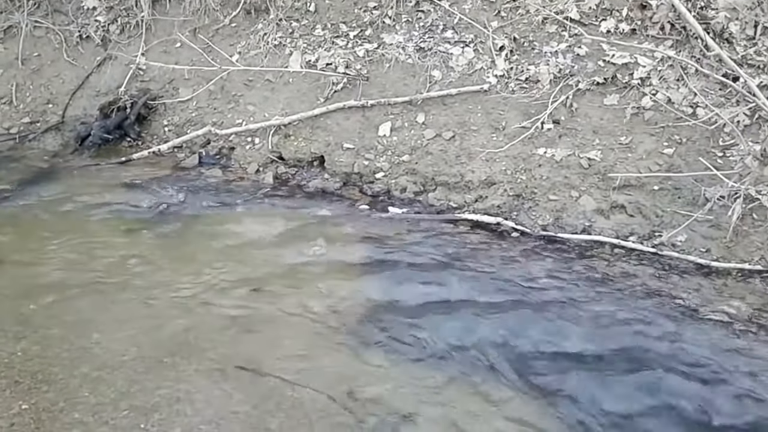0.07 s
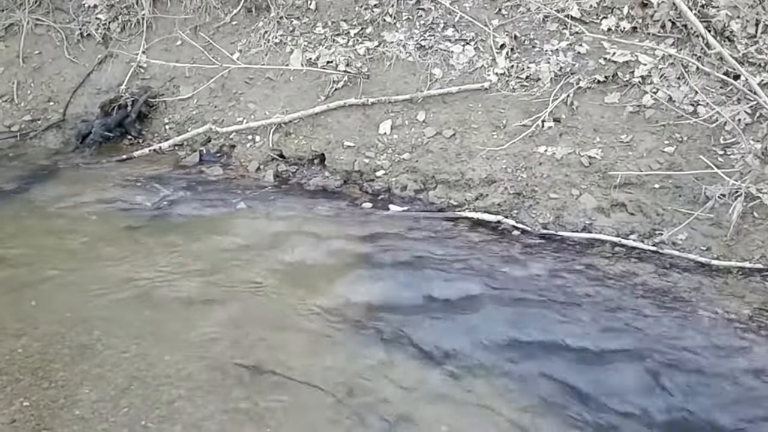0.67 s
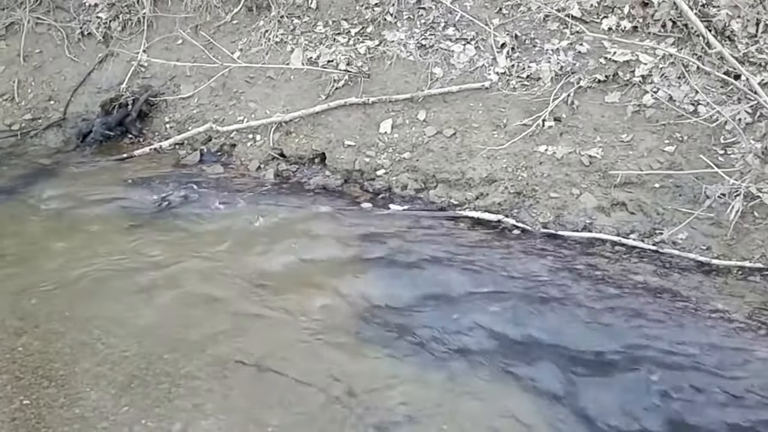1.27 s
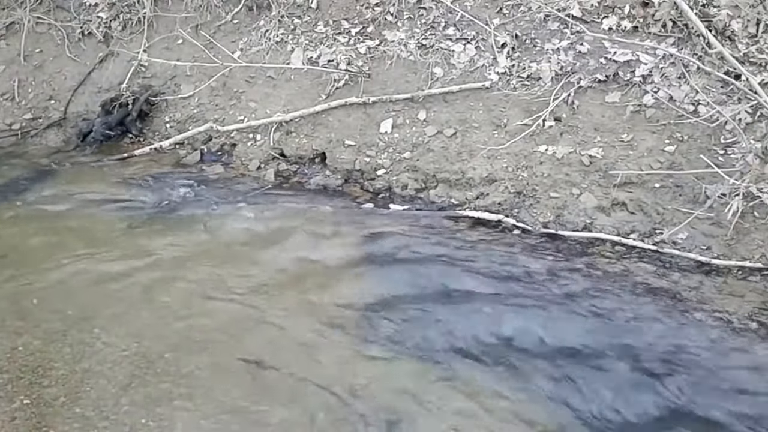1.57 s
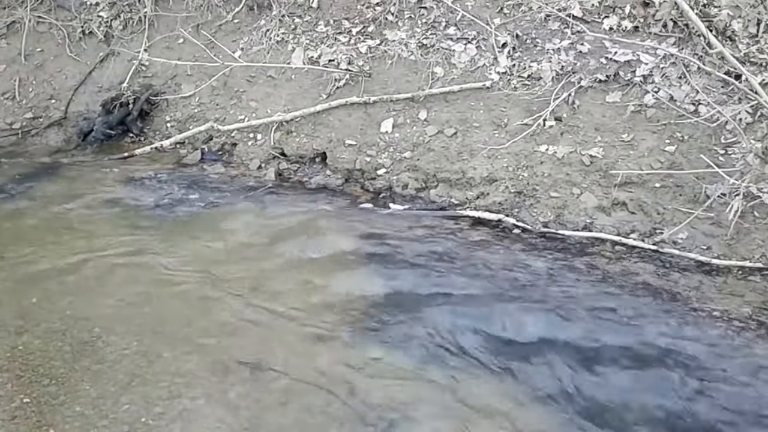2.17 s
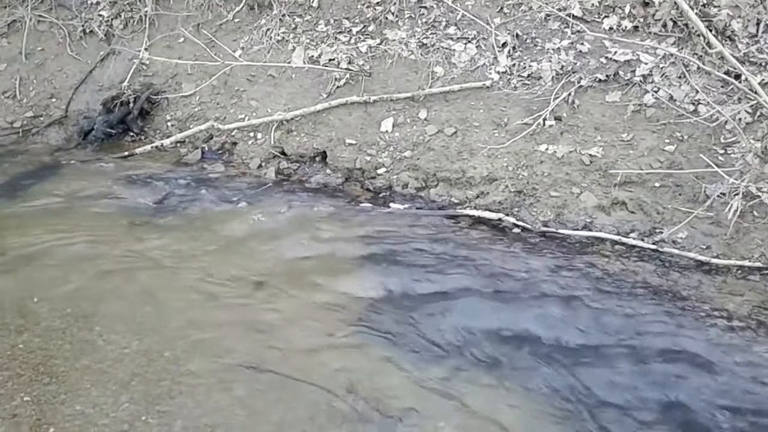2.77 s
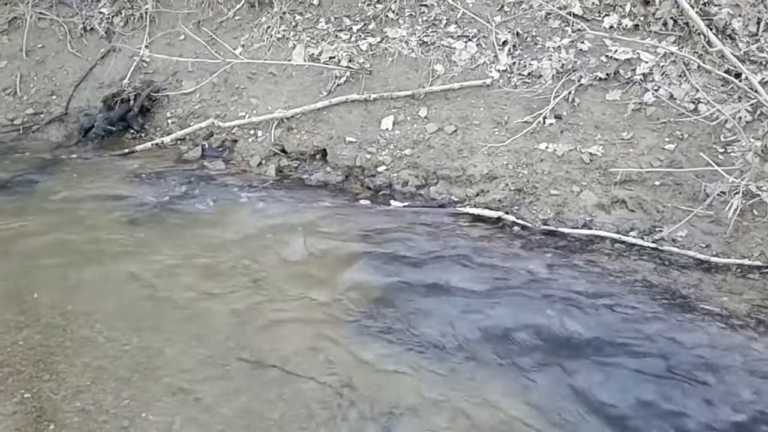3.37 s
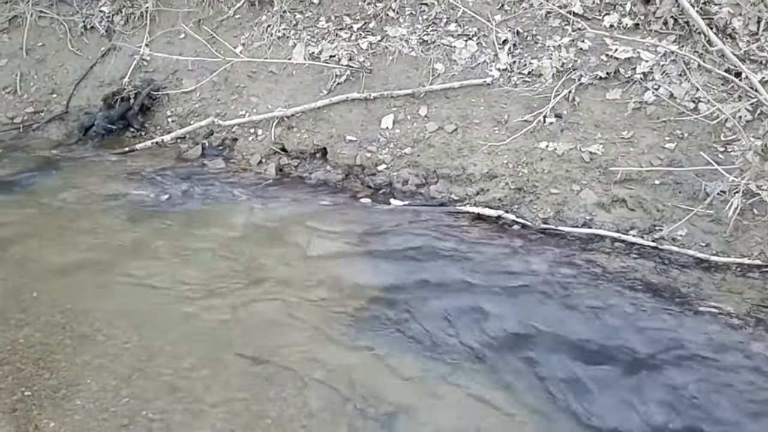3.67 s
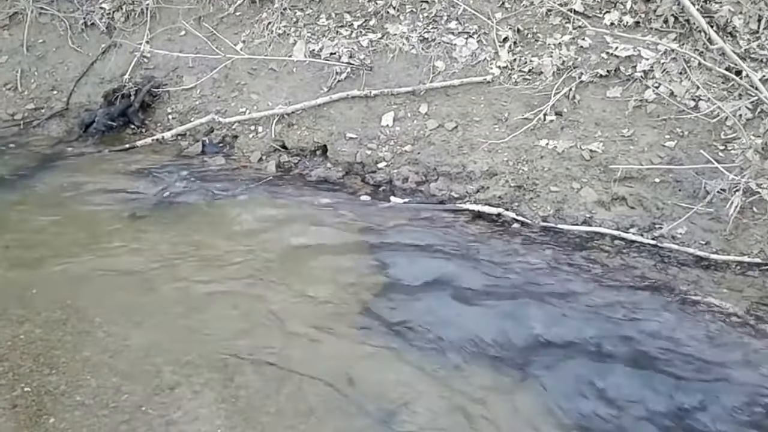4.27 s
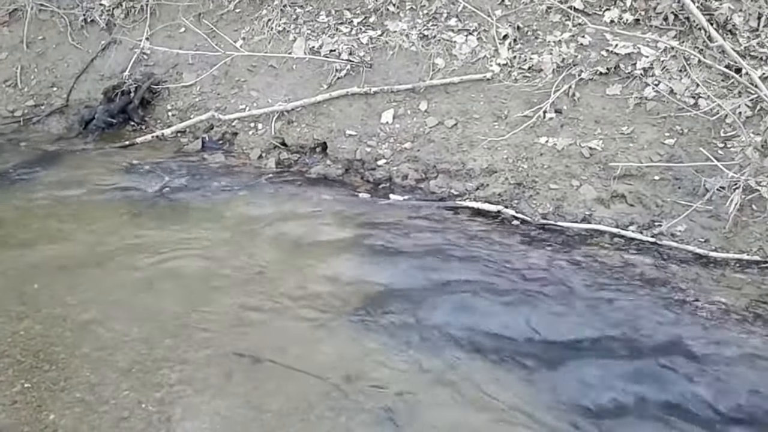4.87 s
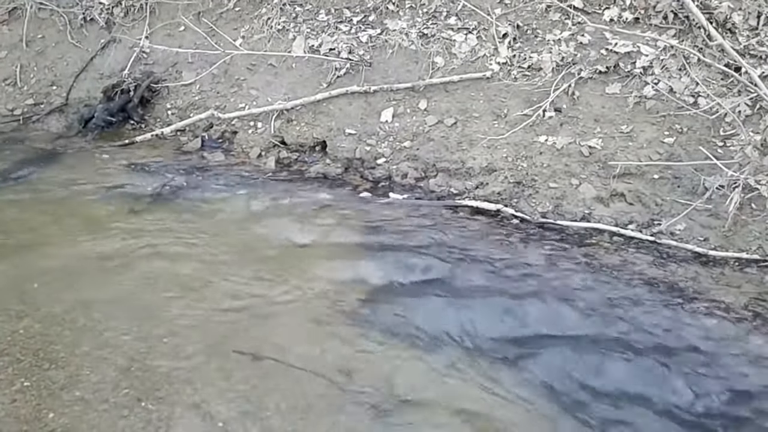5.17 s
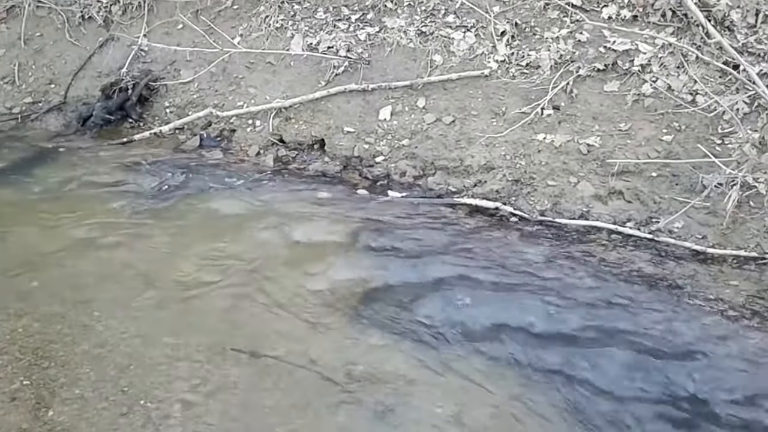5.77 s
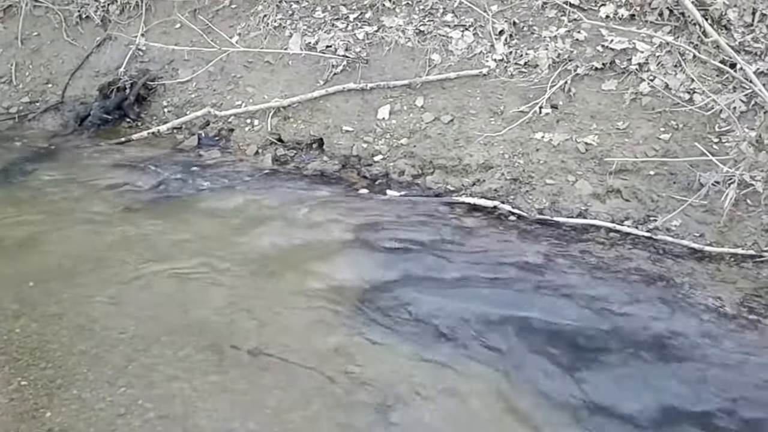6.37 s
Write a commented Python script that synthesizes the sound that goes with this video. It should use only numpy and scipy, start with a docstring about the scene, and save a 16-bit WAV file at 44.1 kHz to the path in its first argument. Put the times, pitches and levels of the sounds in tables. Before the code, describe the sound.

Outdoors, wind buffets the microphone in low, irregular gusts beside a gently babbling stream. A faint, fuzzy high ring dies away in the first seconds. The water keeps up a soft rush while wavelets fold into little gurgles, slap lightly and throw fine spray. Scattered drips and tiny pops sound close by, with a slight short echo off the bank.

```python
"""A shallow stream along a muddy bank: a soft rush of tiny ringing bubbles. Waves close over air pockets
that gurgle, wavelets slap, crests crackle into spray, drops plip and tick, foam pops. The bank adds a
short echo. Gusts buffet the two microphone ports, each in its own way. A thin high ring fades out in
the first seconds."""
import sys
import numpy as np
from scipy import signal
from scipy.fft import rfft, irfft, next_fast_len
from scipy.io import wavfile
from scipy.ndimage import uniform_filter1d, map_coordinates

SR = 44100
rng = np.random.default_rng(int(sys.argv[2]) if len(sys.argv) > 2 else 0)


def persist_wave(psi):
    """Save psi, clipped to +-1, as 16-bit WAV."""
    counts = np.round(np.clip(psi, -1, 1) * 32767).astype(np.int16)
    wavfile.write(sys.argv[1], SR, np.atleast_2d(counts).T)


N = 282681

# likeness of water noise at the two ports: freq_hz, correlation
WATER_COHERENCE = [(100, .05), (420, .15), (700, .7), (1200, .25), (1730, .6), (2200, .55), (3000, .15),
                   (4400, .4), (6500, .1), (15000, 0)]
# drop impact spectrum: freq_hz, density_db
SPLASH_SPECTRUM = [(500, -36), (1000, -6), (2200, 5), (3200, -1), (5200, 1), (6500, 3.5), (9000, -8.5),
                   (15000, -15)]
# water-on-water spectrum: freq_hz, density_db
SLAP_SPECTRUM = [(250, -21), (650, -7.5), (1100, 2), (2200, -3), (3200, -15.5), (6000, -18), (12000, -33)]


def amp(db):
    """Decibels to gain."""
    return 10 ** (np.asarray(db) / 20)


def unit(x):
    """Scale to rms 1."""
    return x / np.sqrt(np.mean(x ** 2) + 1e-20)


def along(points, hz):
    """Interpolate (freq_hz, value) rows on a log axis."""
    knots_hz, values = np.transpose(points)
    return np.interp(np.log(hz + 1), np.log(knots_hz + 1), values)


def curves(rows):
    """One value per sample for each column after time_s."""
    time_s, *columns = np.transpose(rows)
    return [np.interp(np.arange(N) / SR, time_s, column) for column in columns]


def wobble(rate_hz):
    """Smooth random curve, rate_hz knots a second."""
    return map_coordinates(rng.standard_normal(4096), [np.arange(N) * rate_hz / SR], mode="wrap")


def filtered(x, response):
    """Apply a complex frequency response."""
    size = next_fast_len(N + SR // 2)
    return irfft(rfft(x, size) * response(np.fft.rfftfreq(size, 1 / SR)), size)[..., :N]


def noise(gain, coherence):
    """Stereo noise of rms 1 with a given colour and left-right correlation."""
    def mid_side_gain(hz):
        angle = np.arccos(np.clip(along(coherence, hz), -1, 1)) / 2
        return gain(hz) * np.array([np.cos(angle), np.sin(angle)])
    mid, side = filtered(rng.standard_normal((2, N)), mid_side_gain)
    return unit(np.array([mid + side, mid - side]))


def water_noise(spectrum):
    """Coloured noise, partly common to both ports."""
    return noise(lambda hz: amp(along(spectrum, hz)), WATER_COHERENCE)


def patchy(x, depth_db):
    """Random gain patches over time and frequency, shallower in the treble."""
    hz, _, spectra = signal.stft(x, SR, nperseg=512)
    field = rng.standard_normal(spectra.shape[1:])
    field = uniform_filter1d(uniform_filter1d(field, 6, axis=0), 4, axis=1)
    patch_db = depth_db / (1 + (hz[:, None] / 4000) ** 2) * unit(field)
    return unit(signal.istft(spectra * amp(patch_db), nperseg=512)[1][:, :N])


def bursts(start_s, level_db, t60_s, attack_s):
    """Envelope of fast swells with exponential decays."""
    t = np.arange(SR // 3) / SR
    attack = 1 - np.exp(-t / attack_s)
    envelope = np.zeros(N + SR)
    for onset_s, db, decay_s in zip(*np.broadcast_arrays(start_s, level_db, t60_s)):
        envelope[int(onset_s * SR):][:len(t)] += amp(db - 60 * t / decay_s) * attack
    return envelope[:N]


def bubbles(start_s, level_db, hz, t60_s, glide_oct_per_s, pan_db, attack_cycles, spread_s):
    """Damped gliding sines, climbing as a bubble nears the surface; each has its own lag between ports."""
    columns = np.broadcast_arrays(start_s, level_db, hz, t60_s, glide_oct_per_s, pan_db, attack_cycles)
    start_s, level_db, hz, t60_s, glide_oct_per_s, pan_db, attack_cycles = (c[:, None] for c in columns)
    age = np.arange(int(min(t60_s.max(), 0.1) * SR) + 8)
    lag_s = spread_s * rng.standard_normal(start_s.shape)
    index = ((start_s * SR).astype(int) + age).ravel()
    ports = []
    for side in (1, -1):
        t = np.maximum(age / SR - np.maximum(side * lag_s, 0), 0)
        swell = 1 - np.exp(-(t * hz / attack_cycles) ** 2)
        decay = amp(-60 * t / t60_s)
        bend = 1 + np.log(2) * glide_oct_per_s * t * np.minimum(t / t60_s, 1)
        ring = amp(level_db + side * pan_db / 2) * swell * decay * np.sin(2 * np.pi * hz * t * bend)
        ports.append(np.bincount(index, ring.ravel(), N)[:N])
    return np.array(ports)


def swarm(count, low_hz, high_hz, cycles, size_db, climb_oct, attack_cycles, spread_s):
    """Random bubbles shed in threes; rms 1."""
    pitch, life, glide, size, delay = rng.random((count, 5)).T
    start_s = np.repeat(rng.random(count) * N / SR, 3)[:count] + 0.037 * delay
    hz = low_hz * (high_hz / low_hz) ** pitch
    t60_s = cycles / hz * (0.5 + life)
    level_db = size_db * np.minimum(-np.log(1 - size), 4)
    glide_oct_per_s = 2 * glide * climb_oct / t60_s
    pan_db = rng.normal(0, 0.3, count)
    return unit(bubbles(start_s, level_db, hz, t60_s, glide_oct_per_s, pan_db, attack_cycles, spread_s))


def droplets(start_s, level_db, low_hz, high_hz, cycles, scatter_s, count):
    """Each disturbance sheds count small bubbles, most of them early."""
    delay, pitch, size = rng.random((count * len(start_s), 3)).T
    onset_s = np.repeat(start_s, count) + scatter_s * delay ** 2
    db = np.repeat(level_db, count) - 9 * size
    hz = low_hz * (high_hz / low_hz) ** pitch
    return bubbles(onset_s, db, hz, cycles / hz, glide_oct_per_s=4, pan_db=rng.normal(0, 1, len(hz)),
                   attack_cycles=2.6, spread_s=50e-6)


def strays(count, level_db, low_hz, high_hz, extra=()):
    """Random events strewn over the whole time: start_s, level_db, pitch_hz, *extra."""
    when, size, pitch = rng.random((count, 3)).T
    start_s = (np.arange(count) + when) / count * N / SR
    hz = low_hz * (high_hz / low_hz) ** pitch
    return np.column_stack(np.broadcast_arrays(start_s, level_db + 6 * (size - 0.5), hz, *extra))


def plips(start_s, level_db, hz, t60_s, pan_db):
    """Small bubbles swell as they pinch off, sag in pitch and damp quickly."""
    makeup_db = 29.5  # offsets the decay during the swell
    return bubbles(start_s, level_db + makeup_db, hz, t60_s, glide_oct_per_s=-7.5, pan_db=pan_db,
                   attack_cycles=0.48 * hz * t60_s, spread_s=12e-6)


def riffle():
    """Bubbles of four sizes, pulsed by wavelets, over the rush of water farther off."""
    # strength of the flow: time_s, babble_db, spray_db
    flow = [(0, -54.5, -63.5), (1.4, -55.5, -65.5), (2.2, -69, -67.5), (3.5, -65.5, -64.5),
            (4.3, -74, -67.5), (5.1, -64, -71.5), (5.7, -52.5, -68), (6.41, -96, -69.5)]
    # distant water: freq_hz, density_db
    rush_spectrum = [(40, 10), (230, -20), (320, -6.5), (430, -9.5), (700, 2), (1300, 2), (2250, 2.5),
                     (2900, -10.5), (3700, -10), (5200, -8), (6500, -14), (9000, -18), (12000, -14),
                     (15500, -15)]
    babble_db, spray_db = curves(flow)
    rush = amp(-53.5 + 0.14 * wobble(3.6)) * patchy(water_noise(rush_spectrum), depth_db=6)
    large = swarm(1150, 604, 1450, cycles=26.3, size_db=1.5, climb_oct=0.35,
                  attack_cycles=4.1, spread_s=87e-6)
    small = swarm(1200, 1460, 2397, cycles=30, size_db=3, climb_oct=0.055,
                  attack_cycles=27, spread_s=60e-6)
    fizz = swarm(6000, 2730, 8200, cycles=23, size_db=3.6, climb_oct=0.04,
                 attack_cycles=2.5, spread_s=50e-6)
    crackle = swarm(2600, 8500, 15500, cycles=11, size_db=4, climb_oct=0.02,
                    attack_cycles=1, spread_s=60e-6)
    lapping_db = 2.6 * wobble(20) + 1.2 * wobble(8)  # each wavelet traps air and throws spray
    babble = amp(babble_db + lapping_db / 2) * (amp(-6) * large + amp(-4) * small)
    spray = amp(spray_db + lapping_db) * (amp(2) * fizz + amp(-10.5) * crackle)
    return rush + babble + spray


def thin_ring():
    """A fuzzy high ring dies away, upper resonances first."""
    # overall fade: time_s, level_db
    fade = [(0, -52.5), (.45, -53.5), (.8, -57.5), (1.3, -69), (2, -83), (2.6, -100)]
    # resonances: centre_hz, width_hz, level_db, extra_fade_db_per_s
    resonances = [(2325, 105, -1, 0), (2570, 280, -5.5, 4), (3156, 16, -15.5, 12), (3050, 700, -6, 26),
                  (4100, 600, -8, 90), (6250, 220, -9, 190)]
    t = np.arange(N) / SR
    ring = 0
    for centre_hz, width_hz, level_db, fade_db_per_s in resonances:
        band = noise(lambda hz: 1 / (1 + ((hz - centre_hz) / width_hz * 1.5) ** 2), [(2300, 0.8)])
        ring += amp(level_db - fade_db_per_s * t) * band
    return amp(curves(fade)[0]) * ring


def buffet(spectrum, lump_db, lump_hz):
    """Turbulence, unrelated between ports: lumpy from eddy to eddy, level over longer times."""
    turbulence = noise(lambda hz: amp(along(spectrum, hz)), coherence=[(100, 0)])
    turbulence *= amp(lump_db * np.array([wobble(lump_hz), wobble(lump_hz)]))
    local_power = np.abs(uniform_filter1d(turbulence ** 2, size=SR // 14))
    return turbulence / np.sqrt(local_power + 1e-9)


def gust_pressure():
    """Wind strength at each port: gusts swell and ebb on top of the breeze."""
    # light air between gusts: time_s, left_db, right_db
    breeze = [(0, -32, -18), (0.3, -37, -36.5), (0.55, -45.5, -41), (1.3, -43, -43), (2.2, -44.5, -41.5),
              (2.8, -47.5, -64), (2.95, -67, -56), (3.1, -53, -44.5), (3.4, -55.5, -51.5),
              (3.95, -28.5, -49), (4.35, -68, -80), (5.05, -40, -30), (5.5, -50, -58), (5.9, -41.5, -43),
              (6.41, -72, -62)]
    # gusts: peak_s, length_s, left_db, right_db
    gusts = [(0.053, 0.064, -44, -18.5), (0.127, 0.025, -38, -20.5), (0.241, 0.08, -35, -26),
             (0.374, 0.095, -30.5, -26.5), (0.601, 0.014, -46, -29), (0.725, 0.051, -36, -32),
             (0.906, 0.27, -34.5, -39.5), (1.204, 0.027, -33.5, -55), (1.388, 0.044, -29.5, -42),
             (1.46, 0.055, -31, -32.5), (1.86, 0.051, -28.5, -41), (2.14, 0.11, -33, -40),
             (2.509, 0.097, -48, -29), (2.672, 0.33, -58, -35), (3.531, 0.041, -37.5, -41),
             (3.628, 0.075, -29.5, -30), (3.801, 0.038, -32, -24), (3.857, 0.06, -32.5, -35),
             (3.941, 0.063, -27.5, -20.5), (4.03, 0.031, -37, -29), (4.101, 0.075, -28.5, -31.5),
             (4.152, 0.03, -31.5, -37), (4.268, 0.038, -64, -30.5), (4.397, 0.3, -79, -39),
             (4.52, 0.043, -49, -42), (4.631, 0.11, -39, -29), (4.75, 0.044, -49, -42),
             (4.9, .04, -45, -31), (4.975, 0.038, -40, -22.5), (5.058, 0.092, -49, -29.5),
             (5.308, 0.11, -45, -38), (5.601, 0.046, -46, -37.5), (5.744, 0.079, -33.5, -37),
             (5.866, 0.055, -43, -31), (6.147, 0.022, -45, -34)]
    t = np.arange(N) / SR
    power = amp(curves(breeze)) ** 2
    for peak_s, length_s, left_db, right_db in gusts:
        swell = np.exp(-((t - peak_s) / (0.42 * length_s)) ** 2)
        power += amp([[left_db], [right_db]]) ** 2 * swell
    waver_db = 1.76 * np.array([wobble(8), wobble(17)])
    return np.sqrt(power) * amp(waver_db)


def wind():
    """Gusts rumble on each port; small eddies add a brighter flutter, more on the left."""
    # small eddies: time_s, flutter_db
    eddies = [(0, -2.5), (0.9, -2.5), (2.3, -7), (4, -17.5), (5, -24), (6.41, -9)]
    # eddy spectrum: freq_hz, density_db
    flutter_spectrum = [(80, -74), (170, 8.5), (240, 0.5), (330, -4.5), (440, -12.5), (482, -11),
                        (540, -14), (620, -21), (900, -30.5), (2000, -43), (5000, -58.5)]
    # gust spectrum: freq_hz, density_db
    rumble_spectrum = [(15, -64), (35, -34), (55, -8), (85, 0), (120, 2), (170, -6), (240, -16), (330, -29),
                       (450, -39), (900, -83), (2000, -110)]
    port_db, port_highpass_hz = np.array([[2], [-2.5]]), 42
    flutter = amp(curves(eddies)[0] + port_db) * buffet(flutter_spectrum, lump_db=4.5, lump_hz=60)
    pressure = gust_pressure() * (buffet(rumble_spectrum, lump_db=3.3, lump_hz=55) + flutter)
    return filtered(pressure, lambda hz: hz ** 2 / np.hypot(hz ** 2, port_highpass_hz ** 2))


def ticks():
    """Spray lands with a crack, traps a tiny pinging bubble and scatters."""
    # spray landings: start_s, level_db, pitch_hz
    landings = [(0.3473, -31, 5140), (0.987, -31.5, 7540), (1.0455, -35, 6850), (1.1612, -39, 6540),
                (1.237, -36, 4840), (1.8451, -30, 6420), (2.422, -36, 4270), (2.5017, -35, 6530),
                (2.6021, -38, 5340), (2.8397, -36, 4940), (3.305, -37, 6330), (4.2635, -34, 6500),
                (4.389, -39, 8050), (4.436, -37, 5300), (4.451, -37, 5200), (4.5028, -35, 5400),
                (4.638, -34, 4850), (4.8383, -31, 5200), (5.2228, -36, 3950), (5.598, -42, 5000),
                (5.654, -30.5, 4880)]
    # impact spectrum: freq_hz, density_db
    crack_spectrum = [(1200, -24), (3000, -8), (5500, 0), (8000, -4), (11000, -10), (15000, -18)]
    faint = strays(count=18, level_db=-46, low_hz=4670, high_hz=7400)
    start_s, level_db, hz = np.vstack([landings, faint]).T
    crack = bursts(start_s, level_db - 10.5, t60_s=0.009, attack_s=0.0003) * water_noise(crack_spectrum)
    ping = plips(start_s, level_db - 7.5, hz, t60_s=0.0045, pan_db=1.5)
    scatter = droplets(start_s, level_db - 11, 3800, 7200, cycles=22, scatter_s=0.022, count=5)
    return crack + ping + scatter


def drips():
    """Drops hit with a wet crack, a bright plip and a weak after-ring."""
    # drops and small bubbles: start_s, level_db, pitch_hz, t60_s, left_minus_right_db
    drops = [(1.1620, -31.5, 2845, 0.0056, -7.5), (1.3238, -43, 2000, 0.017, 0),
             (2.1098, -45, 2110, 0.016, -1), (2.15, -45.5, 2310, .012, -1), (2.2475, -44, 3780, 0.0063, -9),
             (2.4215, -46.5, 3180, 0.0057, -9), (2.704, -45.5, 1960, 0.016, -1),
             (2.802, -43.5, 2150, .011, -4), (2.9706, -43.5, 2170, 0.011, 1),
             (3.709, -49, 3890, 0.0076, -7), (4.514, -42.5, 2120, 0.011, -3),
             (4.5158, -47.5, 2930, 0.0067, -2), (5.1292, -41, 2080, 0.0072, -5),
             (5.2, -52, 2700, 0.0077, 0), (5.264, -54, 2720, .009, -2), (5.3442, -36, 2120, .008, 0),
             (5.6304, -42.5, 2210, .012, -1), (5.6605, -42, 2100, .01, -9), (5.692, -44.5, 2140, .01, -6),
             (5.8322, -42, 3040, 0.0057, -1), (6.0492, -43.5, 2150, 0.009, -2)]
    faint = strays(count=9, level_db=-51, low_hz=1790, high_hz=2400, extra=[0.01, 0])
    start_s, level_db, hz, t60_s, pan_db = np.vstack([drops, faint]).T
    impact = bursts(start_s, level_db - 15, t60_s=0.026, attack_s=0.0003) * water_noise(SPLASH_SPECTRUM)
    plip = plips(start_s, level_db, hz, t60_s, pan_db)
    after_ring = plips(start_s + t60_s / 2, level_db - 19, hz, 2 * t60_s, pan_db)
    return impact + plip + after_ring


def splashes():
    """A broken crest sprinkles droplets over a crackle of fine bursting ones."""
    # breaking crests: start_s, level_db, t60_s
    crests = [(1.265, -50.5, 0.19), (1.355, -52.5, 0.31), (1.464, -57, 0.11), (1.591, -53, 0.18),
              (1.872, -52, 0.27), (2.503, -58, 0.13), (2.811, -60, 0.57), (3.574, -52.5, 0.14),
              (3.625, -48.5, 0.092), (4.013, -53.5, 0.35), (4.271, -58, 0.17), (4.435, -57, 0.18),
              (4.64, -51.5, .3), (5.225, -56, 0.15), (5.243, -51.5, 0.25), (5.568, -51, 0.3),
              (5.635, -50, .16), (5.905, -48.5, 0.092)]
    start_s, level_db, t60_s = np.transpose(crests)
    clicks_per_s = 1500  # per port, half of them common to both
    clicks = (rng.random((3, N)) < clicks_per_s / SR / 2) * rng.standard_normal((3, N))
    crackle = unit(filtered(clicks[:2] + clicks[2], lambda hz: amp(along(SPLASH_SPECTRUM, hz))))
    sprinkle = droplets(start_s, level_db + 10, 1800, 6800, cycles=21, scatter_s=0.06, count=13)
    return bursts(start_s, level_db - 1, t60_s, attack_s=0.0023) * crackle + sprinkle


def gurgles():
    """A wave folds and churns: a large bubble glides, a weaker twin beats with it, small ones break off."""
    # trapped air pockets: start_s, level_db, pitch_hz, t60_s, glide_oct_per_s, attack_cycles
    pockets = [(1.283, -42, 772, 0.08, 3, 6.5), (1.354, -38, 1090, 0.052, -6, 2),
               (1.465, -35.5, 907, 0.064, 6, 1.4), (1.54, -32, 1176, 0.032, 0.5, 7.9),
               (1.585, -37.5, 705, 0.05, 16, 4.3), (1.722, -43, 615, 0.12, 12, 3.2),
               (1.876, -35.5, 788, 0.1, 4, 3.3), (1.977, -42, 966, 0.13, -0.5, 3.3),
               (2.023, -36, 1470, 0.053, 5, 2), (2.231, -33.5, 1022, 0.045, 10, 0.63),
               (2.24, -36, 1410, 0.071, 13, 9.5), (2.292, -39, 1194, 0.073, 19, 8.2),
               (2.373, -36.5, 840, 0.14, -1, 2.9), (2.548, -38, 676, 0.07, -4, 2),
               (2.599, -39.5, 930, 0.082, 0.5, 2.5), (2.768, -41, 786, 0.14, 11.5, 9.1),
               (2.81, -37.5, 1400, 0.081, 3.5, 4), (2.855, -42, 790, 0.14, 14.5, 4.4),
               (2.946, -40, 1130, 0.065, 9, 3.3), (2.964, -31.5, 1440, 0.042, 12, 3),
               (2.978, -48, 835, 0.2, 7, 4.1), (3.047, -45, 1160, .06, -6, 3),
               (3.571, -42, 903, 0.11, 6.5, 2), (3.615, -46, 1510, 0.038, -2, 2),
               (3.638, -45, 1100, 0.12, 7, 1.9), (3.938, -41, 1204, .08, -1.5, 4.4),
               (4.172, -45, 765, .07, -6, 1.4), (4.263, -35.5, 960, 0.011, -8, .6),
               (4.268, -37.5, 816, 0.18, 7.5, 5.5), (4.352, -39.5, 1260, 0.053, 7, 3),
               (4.43, -39.5, 614, 0.11, 5.5, 2.2), (4.437, -35.5, 1526, 0.05, -9, 1.6),
               (4.45, -40, 1167, 0.1, 6, 3.7), (4.522, -42.5, 562, 0.089, -3, 1.2),
               (4.555, -39, 1400, 0.11, 15, 2), (4.639, -46.5, 694, 0.14, -1, 1.2),
               (4.722, -42, 1220, 0.051, 15, 4.4), (4.804, -40, 597, 0.072, 11.5, 5.6),
               (5.242, -41, 1240, 0.045, 6, 2.7), (5.586, -36, 695, 0.15, -4, 2.1),
               (5.64, -36.5, 697, 0.11, 4.5, 5), (5.789, -36, 852, .11, 17, 10.7),
               (5.92, -41.5, 1310, 0.17, -4, 9.8), (5.954, -43, 776, 0.12, -1.5, 2),
               (6.016, -38, 1220, 0.12, 7.5, 13), (6.197, -43, 1230, 0.057, 8, 1.7),
               (6.288, -43, 1220, 0.11, 5, 3.3), (6.382, -39.5, 1095, 0.073, -3, 0.6)]
    # ring of the faint pockets: t60_s, glide_oct_per_s, attack_cycles
    faint_ring = [0.115, 6.5, 5.1]
    faint = strays(count=12, level_db=-48, low_hz=630, high_hz=1487, extra=faint_ring)
    start_s, level_db, hz, t60_s, glide_oct_per_s, attack_cycles = np.vstack([pockets, faint]).T
    delay, detune = rng.random((len(start_s), 2)).T
    main = bubbles(start_s, level_db - 0.8, hz, t60_s, glide_oct_per_s,
                   pan_db=0, attack_cycles=attack_cycles, spread_s=70e-6)
    twin_hz = hz * (0.74 + 0.608 * detune)
    twin = bubbles(start_s + 0.015 * delay, level_db - 10, twin_hz, 0.72 * t60_s, glide_oct_per_s,
                   pan_db=0, attack_cycles=1.2, spread_s=380e-6)
    shed = droplets(start_s, level_db - 7.5, 965, 2540, cycles=43, scatter_s=0.036, count=6)
    churn = bursts(start_s, level_db - 20.5, 2 * t60_s, attack_s=0.0034) * water_noise(SLAP_SPECTRUM)
    shudder_db = 2.4 * wobble(170)
    return (main + twin) * amp(shudder_db) + shed + churn


def pops():
    """Foam films burst with very fine clicks."""
    # bursting films: start_s, level_db
    films = [(1.3658, -46), (1.7325, -52), (1.8444, -35), (1.8851, -34), (2.0762, -41), (3.4979, -51),
             (4.0796, -38), (4.2622, -32), (5.6511, -37), (5.7763, -34)]
    # click spectrum: freq_hz, density_db
    snap_spectrum = [(4000, -20), (10000, -4), (13000, 0)]
    start_s, level_db = np.transpose(films)
    return bursts(start_s, level_db - 3, t60_s=0.004, attack_s=0.0001) * water_noise(snap_spectrum)


def slaps():
    """Water meets water with a dull, unpitched clap."""
    # wavelets slapping shut: start_s, level_db
    wavelets = [(1.465, -49), (1.982, -40.5), (2.233, -46), (2.375, -40.5), (2.504, -38), (2.803, -45),
                (3.571, -57), (4.264, -46), (4.437, -45), (5.692, -43), (6.05, -41.5), (6.197, -53),
                (6.287, -41.5)]
    start_s, level_db = np.transpose(wavelets)
    return bursts(start_s, level_db, t60_s=0.044, attack_s=0.00033) * water_noise(SLAP_SPECTRUM)


def bank_echo(water):
    """The bank scatters a short, soft echo."""
    # echo decay: freq_hz, t60_s
    decay = [(200, 0.34), (2000, 0.063), (10000, 0.23)]
    hz, t, spectra = signal.stft(rng.standard_normal((2, SR // 3)), SR, nperseg=256)
    tail = signal.istft(spectra * amp(-60 * t / along(decay, hz)[:, None]), SR, nperseg=256)[1]
    return signal.fftconvolve(water, tail / np.linalg.norm(tail[0]), axes=1)[:, :N]


def scene():
    """Water reaches the ports with level and phase differences; wind acts on them directly."""
    # level between ports: freq_hz, left_minus_right_db
    tilt = [(600, 0), (1000, -1), (1600, -2.5), (1950, 4), (2500, -1.5), (3600, -6.5), (4900, 1),
            (6200, -8.5), (7500, -2.5), (10000, 0), (15000, 1.5)]
    # phase between ports: freq_hz, left_lead_rad
    lead = [(600, 0), (1150, -.2), (1550, 1.9), (1730, 3), (1950, 1.3), (2700, .3), (3100, 3), (4500, 3.3),
            (5300, 5.1), (7200, 3.5), (12000, 4.7)]
    water = riffle() + gurgles() + slaps() + splashes() + drips() + ticks() + pops()
    water += amp(-13.5) * bank_echo(water)
    side = np.array([[0.5], [-0.5]])
    water = filtered(water, lambda hz: amp(side * along(tilt, hz)) * np.exp(1j * side * along(lead, hz)))
    return water + thin_ring() + wind()


def record(dry):
    """Brick-wall low-pass."""
    cutoff_hz = 15850
    return filtered(dry, lambda hz: hz < cutoff_hz)


dry = scene()
out = record(dry)
persist_wave(out)
```